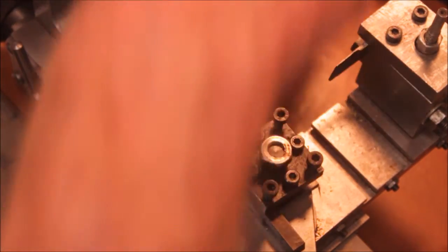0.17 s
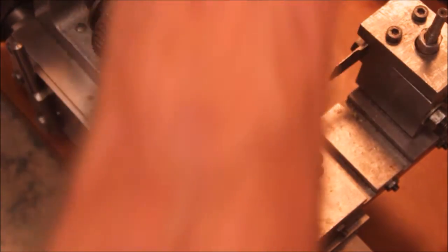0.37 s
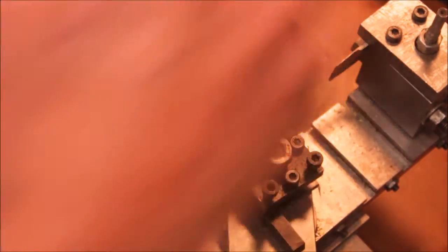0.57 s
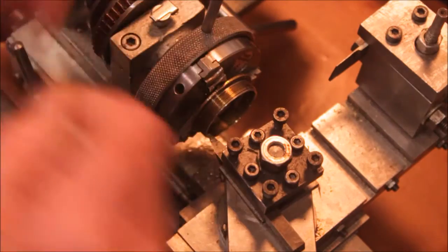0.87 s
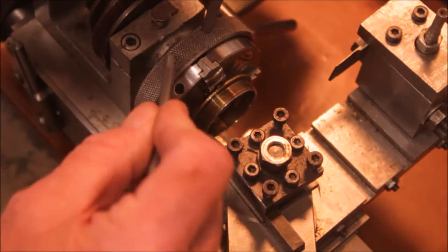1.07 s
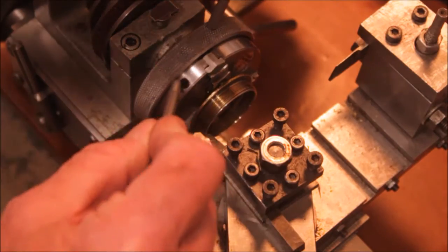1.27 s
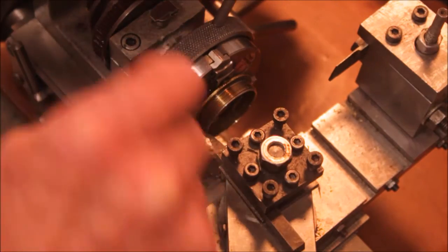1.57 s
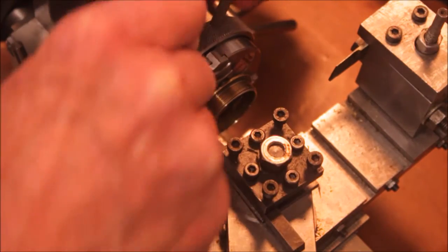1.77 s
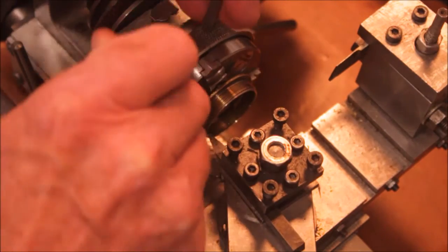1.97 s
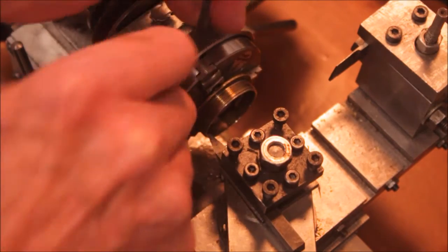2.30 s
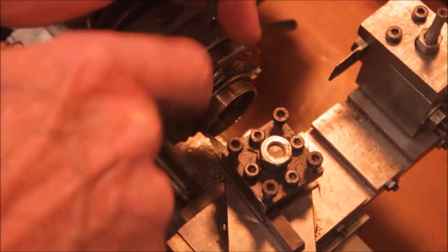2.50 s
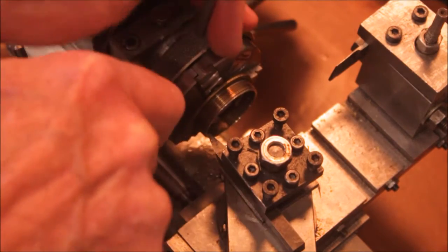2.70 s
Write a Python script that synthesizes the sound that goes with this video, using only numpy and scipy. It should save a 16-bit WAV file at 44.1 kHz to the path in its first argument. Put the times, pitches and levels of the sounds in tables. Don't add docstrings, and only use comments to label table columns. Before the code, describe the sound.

Metallic clicks and taps from a hand on a stopped lathe chuck, heard very close. A lever scrapes and snaps at 0.25 s; a light tick at 0.65. Pin ticks near 1.3 lead to sharp, bright clicks at 1.4, then a ringing strike at 1.63 and dull rebound at 1.72. After a lull, a clack at 2.42, clustered knocks at 2.55, low thud at 2.63, and faint last tick at 2.73. Skin brushes softly; quiet hum and hiss continue.

```python
import sys
import numpy as np
from scipy import signal
from scipy.io import wavfile
from scipy.ndimage import uniform_filter1d

SR = 44100
rng = np.random.default_rng(int(sys.argv[2]) if len(sys.argv) > 2 else 0)


def transcribe(signal):
    frames = np.atleast_2d(signal).T
    limited = np.clip(frames, -1, 1)
    pcm = np.round(limited * 32767).astype(np.int16)
    wavfile.write(sys.argv[1], SR, pcm)


def gain_from_db(level_db):
    decades = np.asarray(level_db, float) / 20
    return 10 ** decades


N = 125685

# f/Hz, level/dB, t60/s
LEVER_MODES = [(1940, -22, 0.028), (2674, -9.5, 0.019), (3700, -16, 0.025), (4800, -9.5, .012),
               (6450, -38, 0.018), (7300, -4, 0.014), (8450, -33, 0.028), (9670, -14, 0.029),
               (10560, -8, 0.03), (13400, -31, .015), (13260, -22, 0.014)]
HOUSING_CUT_HZ = 501


def level(x, db):
    return x * gain_from_db(db) / np.sqrt(np.mean(x ** 2))


def band(x, hz, width):
    return signal.lfilter(*signal.iirpeak(hz, hz / min(width, SR / 3), fs=SR), x)


def highpass(x, order, hz):
    return signal.sosfilt(signal.butter(order, hz, "high", fs=SR, output="sos"), x)


def lowpass(x, hz):
    return signal.sosfilt(signal.ellip(8, 0.2, 60, hz, fs=SR, output="sos"), x)


def walk(rate):
    k = int(SR / rate)
    steps = np.repeat(rng.standard_normal(N // k + 1), k)
    return 0.66 * uniform_filter1d(uniform_filter1d(steps, k), k)[:N]


def add(out, s, x):
    i = max(int(s * SR), 0)
    out[i:i + len(x)] += x[:N - i]


def push(ms):
    t = np.arange(SR // 4) / SR
    return np.sin(np.pi * np.clip(t * 1000 / ms, 0, 1))


def grit(count, spread_db):
    grains_per_s = 9000
    chance, side, size = rng.random((3, count))
    struck = chance < grains_per_s / SR
    return struck * np.sign(side - 0.5) * gain_from_db(-spread_db * np.log(size + 0.0032))


def ring(x, modes, spread=0, count=5):
    scatter_db = 4
    out = 0
    chance = rng.standard_normal((len(modes), count, 3))
    for (hz, db, t60), partials in zip(modes, chance):
        for offset, size, turn in partials:
            turn_per_sample = 2 * np.pi * hz * (1 + spread * offset) / SR
            pole = np.exp(1j * turn_per_sample - np.log(1000) / (t60 * SR))
            partial = signal.lfilter([np.exp(0.5j * turn)], [1, -pole], x).imag
            out = out + gain_from_db(db + scatter_db * size) / np.sqrt(count) * partial
    return out


def workshop():
    # f/Hz, level/dB per Hz
    air = np.array([(25, -40), (60, -14), (200, -16), (400, -12), (700, -17), (1300, -20), (3500, -21.5),
                    (15000, -29)])
    # f/Hz, width/Hz, level/dB
    machines = [
        (62.3, 17.4, -64.5),
        (115.5, 25, -65),
        (350.5, 26, -67),
        (408, 18, -66),
        (1313, 210, -66),
    ]
    swell_db, flicker_db = 0.2, 0.35
    out, swell = 0, walk(0.98)
    for hz in 28 * 2 ** np.arange(0, 9.4, 0.5):
        x = band(band(rng.standard_normal(N), hz, hz / 2), hz, hz / 2)
        db = np.interp(np.log(hz), np.log(air[:, 0]), air[:, 1])
        out = out + x * gain_from_db(db + swell_db * swell + flicker_db * walk(9.53))
    out = level(lowpass(out, 17300), -55)
    out = out + gain_from_db(-59 + 1.9 * walk(2.3)) * np.sin(2 * np.pi * 57.3 * np.arange(N) / SR)
    for hz, width, db in machines:
        out = out + level(band(rng.standard_normal(N), hz, width), db)
    return out


def room_tail():
    # f/Hz, width/Hz, level/dB, t60/s
    bands = [
        (720, 1600, -15.5, 0.19),
        (3000, 2900, -21.5, 0.33),
        (8000, 30500, -24.5, 0.18),
        (13500, 2000, -15, 0.11),
    ]
    t = np.arange(SR // 2) / SR
    tail = 0
    for hz, width, db, t60 in bands:
        decay = np.exp(-np.log(1000) * t / t60) * np.minimum(t / 0.0017, 1)
        x = band(rng.standard_normal(len(t)), hz, width) * decay
        tail = tail + gain_from_db(db) * x / np.sqrt(np.sum(x ** 2)) * np.sqrt(width * np.pi / SR) * 2
    return tail


def housing(x):
    # f/Hz, level/dB, t60/s
    casting = [(433, -3.5, 0.029), (587.3, -5, 0.052), (617, -2.5, 0.06), (749, -5.5, 0.04),
               (921.5, 1.5, 0.035), (1180, -12, 0.05), (2700, -7, 0.048)]
    return highpass(ring(x, casting, spread=0.0045, count=1), 4, HOUSING_CUT_HZ)


def thuds():
    # t/s, level/dB, f/Hz, t60/s
    blows = [
        (0.283, -35.5, 304, 0.054),
        (0.286, -43.5, 193, 0.1),
        (0.296, -38.5, 86.7, 0.25),
        (2.624, -29.5, 252, 0.095),
        (2.644, -35, 90.4, 0.25),
        (2.665, -38, 170, 0.062),
        (2.83, -48, 146, 0.088),
    ]
    out = np.zeros(N)
    for s, db, hz, t60 in blows:
        add(out, s, gain_from_db(db - 36.5) * ring(push(0.93), [(hz, 0, t60), (1.6 * hz, -4, t60)], count=1))
    return out


def knocks():
    # t/s, peak level/dB, contact/ms
    rocking = [(.002, -48, 3.9), (.242, -40.5, 4.5), (.259, -28.5, 2.9), (.28, -37.5, 2.5),
               (.288, -58, 6.4), (1.287, -34.5, 2.4), (1.388, -34.5, 2.3), (1.3985, -24.5, 0.55),
               (1.44, -43, 5.4), (1.613, -39, 2.9), (1.634, -20.5, 2.36), (1.696, -34, 4.9),
               (1.704, -42, 6.2), (1.713, -30.5, 4.1), (1.7215, -23, 1.7), (1.727, -32, 3.35),
               (1.76, -39, 3.4), (2.32, -48, 6.5), (2.501, -32, 1.5), (2.517, -32.5, 6.3),
               (2.530, -20.5, 2.57), (2.536, -17, 3.4), (2.554, -22.5, 2.75), (2.561, -32.5, 2.5),
               (2.585, -43, 13), (2.625, -43.5, 12.5), (2.642, -42.5, 2.4), (2.835, -45.5, 2.5)]
    out = np.zeros(N)
    chatter = np.sin(2 * np.pi * 612 * np.arange(SR // 4) / SR)
    for s, db, ms in rocking:
        knock = housing(push(ms) * chatter)
        add(out, s, gain_from_db(db) * knock / np.abs(knock).max())
    return out


def brushes():
    # centre t/s, length/s, level/dB, f/Hz, width/Hz
    strokes = [(1.402, 0.025, -42, 1500, 3000), (.85, 0.042, -45.5, 13200, 7040),
               (0.958, 0.24, -56, 12500, 7000), (1.297, 0.026, -42, 1900, 2090),
               (1.436, 0.019, -41.5, 2500, 3000), (1.764, 0.27, -58.5, 11800, 8000),
               (2.214, 0.052, -54.5, 2240, 3660), (2.334, 0.057, -56.5, 9000, 12100),
               (2.422, 0.18, -52.5, 11800, 9000), (2.547, 0.019, -38.5, 12700, 7000),
               (0.276, 0.047, -46, 6000, 12000), (.652, 0.019, -48.5, 1110, 1600),
               (2.422, 0.027, -44.5, 4800, 2500), (1.638, .016, -34, 3000, 1600),
               (2.207, 0.096, -55, 910, 700), (2.544, 0.062, -41.5, 3860, 6700),
               (2.783, 0.056, -54.5, 14000, 5000)]
    out, t = np.zeros(N), np.arange(SR // 3) / SR
    middle = t[-1] / 2
    for s, length, db, hz, width in strokes:
        grains = grit(len(t), 4.5) + 0.06 * rng.standard_normal(len(t))
        rub = level(band(band(grains, hz, width), hz, 2 * width), db)
        add(out, s - middle, rub * np.exp(-2 * ((t - middle) / length * 2) ** 2))
    return out


def scrapes():
    # start t/s, length/s, start level/dB, end level/dB
    slides = [
        (0.2185, 0.019, -26, -46),
        (0.2272, .0285, -36.5, -24),
        (0.2595, 0.012, -22, -40.5),
    ]
    out, t = np.zeros(N), np.arange(SR // 3) / SR
    for s, length, db0, db1 in slides:
        pressure = gain_from_db(db0 + (db1 - db0) * np.minimum(t / length, 1))
        force = grit(len(t), 1.5) * (t < length) * np.minimum(t / 0.003, 1) * pressure
        rasp = band(band(force, 3700, 10000), 4100, 11000)
        add(out, s, gain_from_db(-20) * ring(force, LEVER_MODES, 0.033) + gain_from_db(-31) * housing(force) + gain_from_db(4) * rasp)
    return out


def glints():
    # t/s, peak level/dB, f/Hz, t60/s
    catches = [(0.2217, -30, 7400, 0.018), (0.2244, -33, 12700, .015), (0.22, -32, 4640, .02),
               (0.2382, -20, 7300, .009), (.2572, -18, 4470, 0.0088), (.2572, -14, 9340, 0.0075),
               (0.2572, -9, 7480, .007), (0.256, -19, 14700, 0.011), (.649, -40, 10360, .025),
               (1.718, -40, 8300, 0.022), (.259, -26, 2650, 0.053), (.649, -50, 2160, 0.039),
               (1.2951, -33, 2700, 0.044), (1.3982, -37, 2695, 0.063), (1.402, -36.5, 1180, 0.053),
               (1.4113, -30, 10700, 0.026), (1.434, -36, 2680, 0.024), (1.721, -43, 2700, 0.049),
               (2.42, -37, 3000, 0.027), (2.519, -45, 2770, 0.044), (2.5267, -52, 3570, 0.0077),
               (2.534, -41, 4420, .015), (2.541, -39, 4450, 0.018), (2.541, -42, 7600, .02),
               (2.5495, -35, 4440, .015), (2.549, -34.5, 6350, 0.031), (2.5516, -33, 2700, 0.028),
               (2.553, -36, 7650, 0.021)]
    out = np.zeros(N)
    for s, db, hz, t60 in catches:
        force = push(900 / hz) * (np.arange(SR // 4) < SR // 400)
        flash = band(ring(force, [(hz, 0, t60)], 0.015, count=2), hz, hz)
        add(out, s, gain_from_db(db) * flash / np.abs(flash).max())
    return out


def hits(table, modes, spread, crack_ms):
    crack_width = 0.5
    shimmer_db, shimmer_t60_s = -25.5, 0.05
    out = np.zeros(N)
    t = np.arange(SR // 4) / SR
    age = t * 1000 / crack_ms
    blow = np.diff(np.minimum(age * 4, 1), prepend=0)
    for s, crack_db, hz, ring_db, housing_db in table:
        force = rng.standard_normal((2, len(age))) * age * np.exp(-2 * age)
        crack = band(band(force[0], hz, crack_width * hz), hz, 2 * crack_width * hz)
        metal = ring(force[1] / np.sqrt(np.sum(force[1] ** 2)), modes, spread)
        fade = np.exp(-np.log(1000) * t / shimmer_t60_s) * np.minimum(age, 1)
        shimmer = fade * band(rng.standard_normal(len(age)), 8000, 9300)
        metal = metal + gain_from_db(shimmer_db + 14.5) * shimmer
        add(out, s, gain_from_db(crack_db) * crack / np.abs(crack).max())
        add(out, s, gain_from_db(ring_db) * metal + gain_from_db(housing_db) * housing(blow))
    return highpass(out, 2, HOUSING_CUT_HZ)


def lever():
    # t/s, crack level/dB, crack f/Hz, ring level/dB, housing level/dB
    snaps = [
        (.2225, -37, 7400, -50, -61),
        (.2382, -37, 7300, -52, -57),
        (.2568, -16, 7740, -42, -60),
        (.2575, -31, 9420, -24.5, -51),
    ]
    return hits(snaps, LEVER_MODES, 0.029, 0.35)


def collar():
    # f/Hz, level/dB, t60/s
    collar_modes = [(2140, -25, 0.13), (2410, -17, 0.059), (2560, -11.5, 0.062), (3460, -12, 0.023),
                    (3930, -29, 0.019), (4700, -25, 0.047), (5370, -14, 0.025), (7200, -6, .03),
                    (7860, 1, 0.032), (8500, -5, 0.065), (10450, -17, .04), (12300, -22, .03),
                    (13100, -0.5, 0.034), (14900, -5, .035)]
    # t/s, crack level/dB, crack f/Hz, ring level/dB, housing level/dB
    strikes = [
        (1.6315, -9, 12500, -30.5, -48),
        (1.6326, -19.5, 3170, -26.5, -69),
        (1.650, -38, 8200, -52, -55),
        (1.7185, -42, 8300, -51, -38.5),
        (2.4211, -23.5, 2400, -48, -41),
        (2.4212, -19, 12400, -80, -69),
        (2.553, -34, 2700, -41, -28.5),
        (2.7322, -40, 9200, -57.5, -52),
    ]
    return hits(strikes, collar_modes, 0.02, 0.27)


def pin():
    # f/Hz, level/dB, t60/s
    pin_modes = [(7000, -36, 0.013), (9000, -8, 0.03), (10360, -3.5, 0.033), (11000, -5, 0.018),
                 (11200, -15, 0.0093), (12700, -23, 0.012)]
    # t/s, crack level/dB, crack f/Hz, ring level/dB, housing level/dB
    ticks = [(.6486, -31.5, 4500, -41, -69), (.6488, -31, 940, -54, -51), (1.2655, -53, 13500, -68, -62),
             (1.2672, -37, 14500, -67, -76), (1.285, -41, 9000, -52.5, -55),
             (1.294, -32, 10700, -46.5, -40), (1.2945, -30, 2650, -64, -48), (1.328, -44, 12000, -64, -70),
             (1.3925, -24, 8000, -45, -49), (1.3950, -12.5, 10800, -24.5, -59),
             (1.3962, -13.5, 11900, -18, -41), (1.4285, -31, 9500, -57, -48), (1.4325, -24, 3450, -62, -49)]
    return hits(ticks, pin_modes, 0.0104, 0.63)


def scene():
    near = thuds() + knocks() + brushes() + scrapes() + lever() + collar() + pin()
    flashes = glints()
    scatter = signal.fftconvolve(near + 0.65 * flashes, room_tail())[:N]
    return (near + flashes + scatter + workshop())[None]


def top_cut(x):
    return signal.sosfilt(signal.butter(12, 16820, fs=SR, output="sos"), x)


def record(dry):
    # centre t/s, length/s, above f/Hz, depth/0-1
    dropouts = [(0.748, 0.015, 2020, 0.89), (0.791, 0.0087, 900, 0.78), (1.382, 0.015, 1160, 0.93),
                (2.115, 0.0082, 1220, 0.89), (2.668, 0.016, 1710, 0.88), (2.837, 0.012, 1500, 0.58)]
    # centre t/s, length/s, level/dB, f/Hz, width/Hz
    noise_bands = [(0.747, 0.037, -62, 4770, 300), (0.788, 0.03, -65, 3760, 300),
                   (1.389, .016, -45, 10300, 2200), (2.107, 0.018, -54.5, 4430, 500),
                   (2.665, 0.022, -69, 4170, 300)]
    t = np.arange(N) / SR
    for s, length, hz, depth in dropouts:
        high = signal.sosfiltfilt(signal.butter(4, hz, "high", fs=SR, output="sos"), dry)
        dry = dry - high * depth * np.exp(-(2 * (t - s) / length) ** 4)
    for s, length, db, hz, width in noise_bands:
        edges = [hz - width / 2, hz + width / 2]
        bandpass = signal.butter(4, edges, "band", fs=SR, output="sos")
        noise_band = level(signal.sosfilt(bandpass, rng.standard_normal(N)), db)
        dry = dry + noise_band * np.exp(-(2 * (t - s) / length) ** 4)
    return top_cut(lowpass(dry, 15950))


dry = scene()
out = record(dry)
transcribe(out)
```